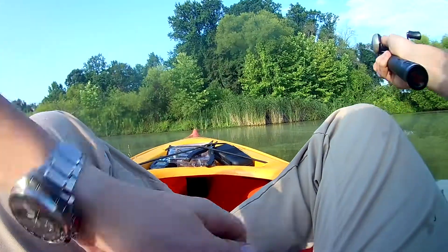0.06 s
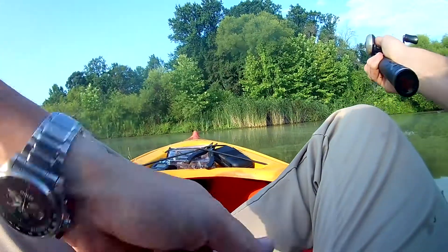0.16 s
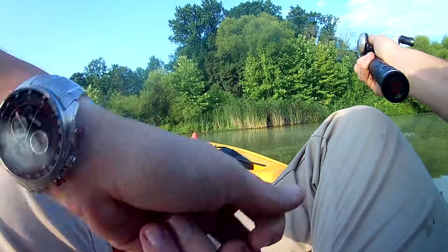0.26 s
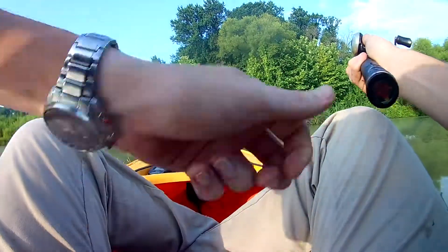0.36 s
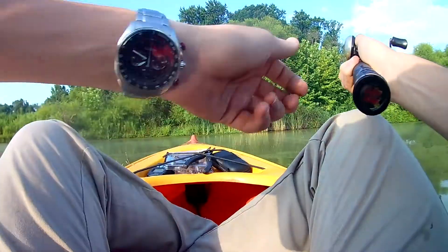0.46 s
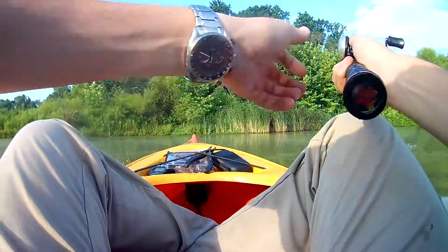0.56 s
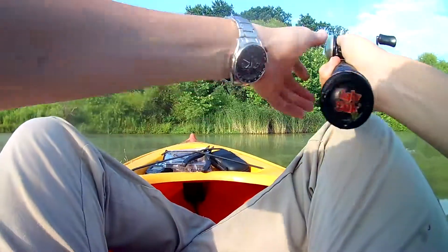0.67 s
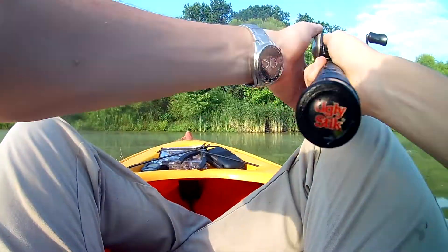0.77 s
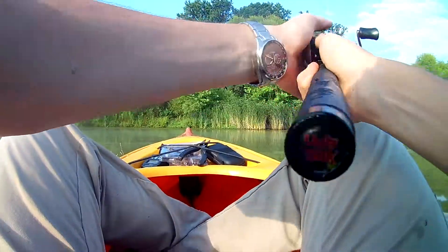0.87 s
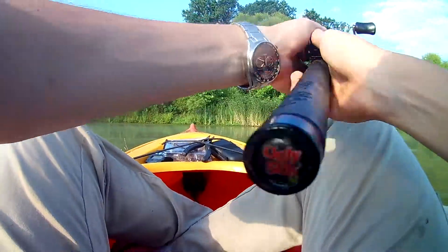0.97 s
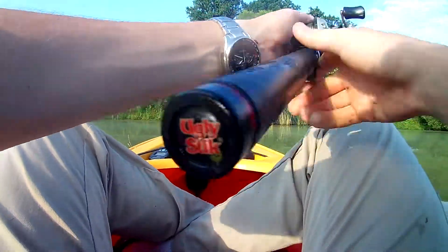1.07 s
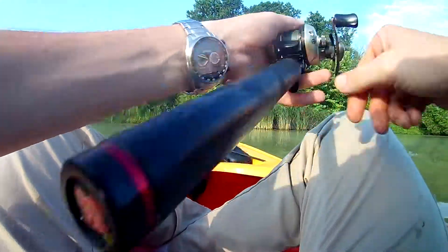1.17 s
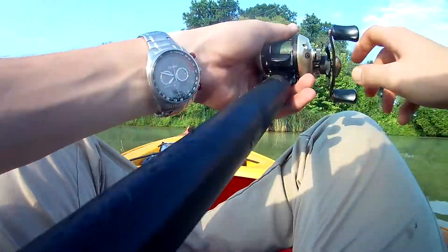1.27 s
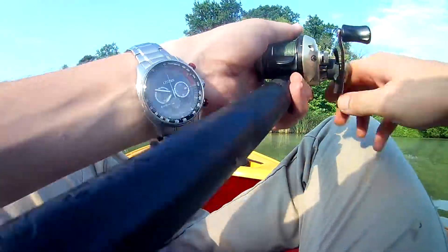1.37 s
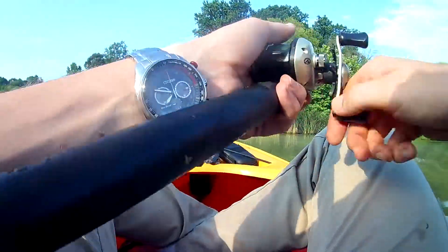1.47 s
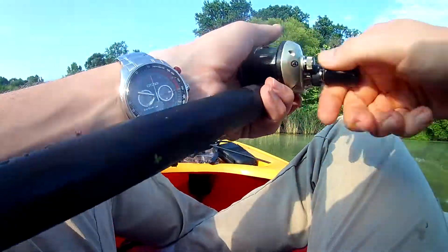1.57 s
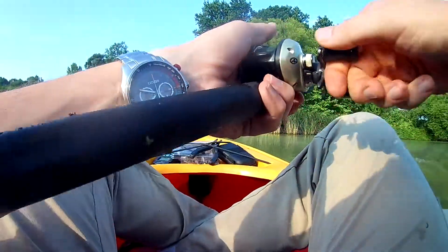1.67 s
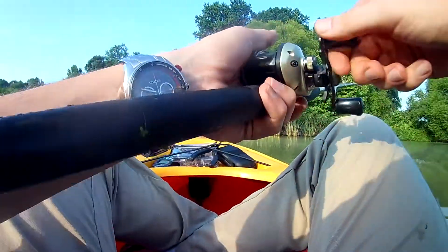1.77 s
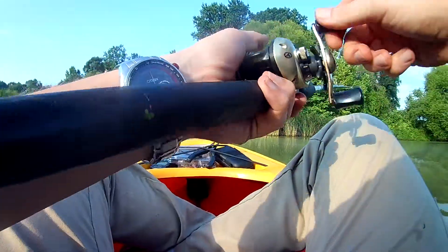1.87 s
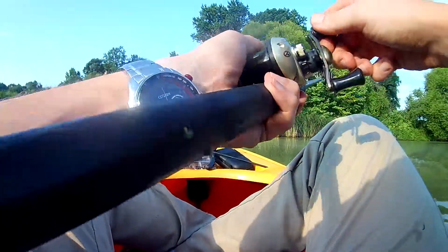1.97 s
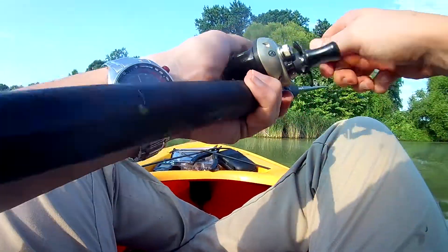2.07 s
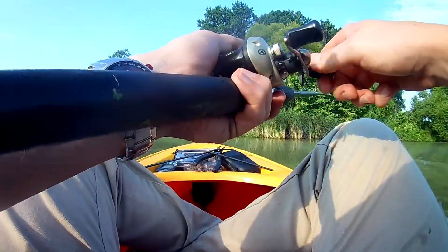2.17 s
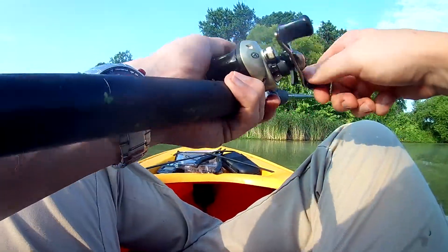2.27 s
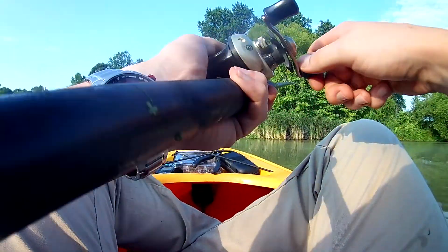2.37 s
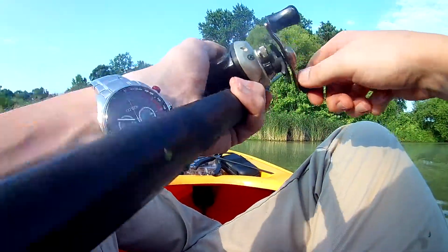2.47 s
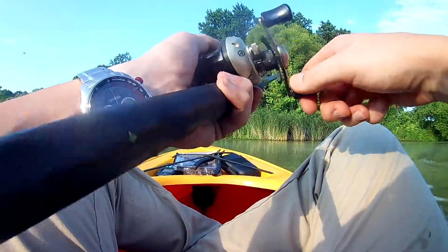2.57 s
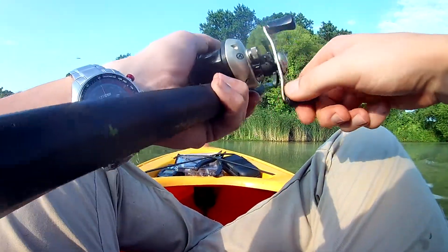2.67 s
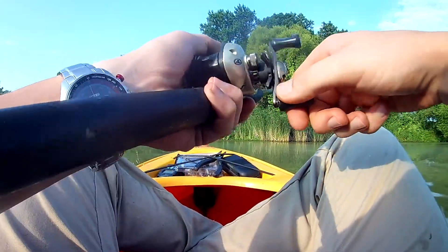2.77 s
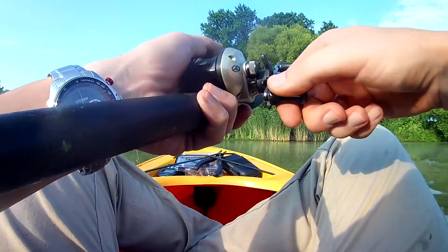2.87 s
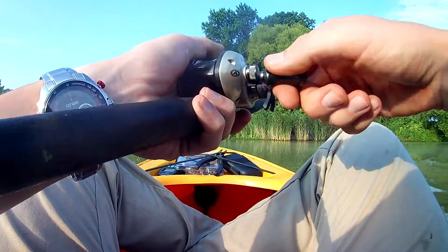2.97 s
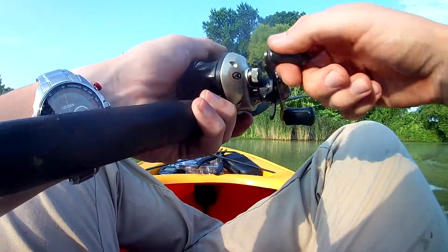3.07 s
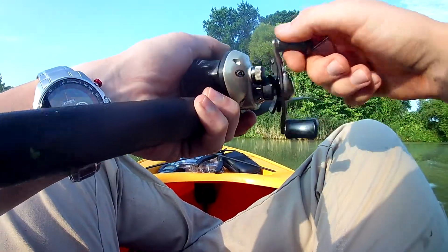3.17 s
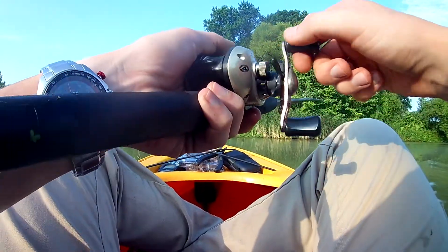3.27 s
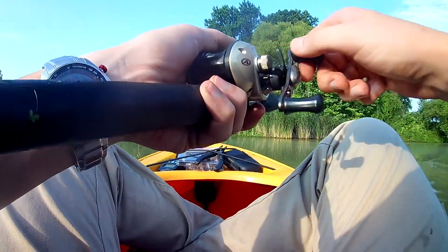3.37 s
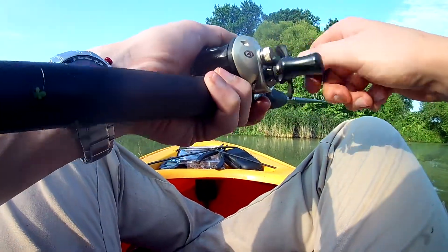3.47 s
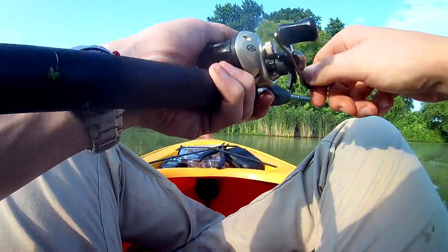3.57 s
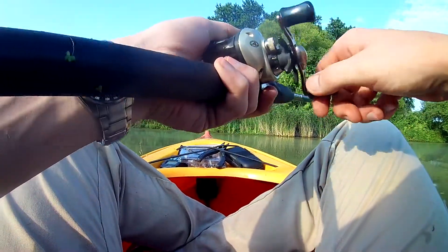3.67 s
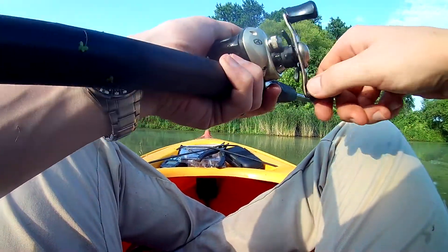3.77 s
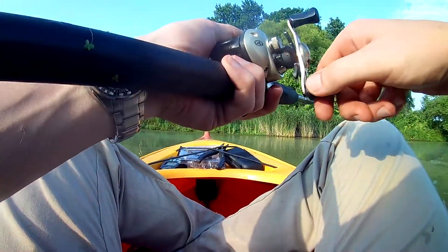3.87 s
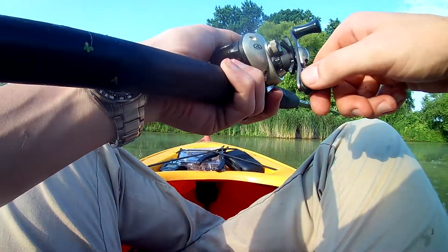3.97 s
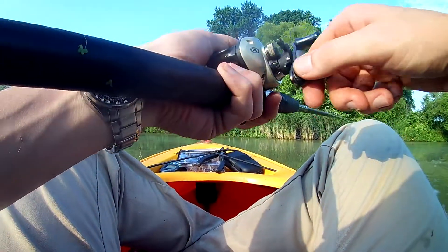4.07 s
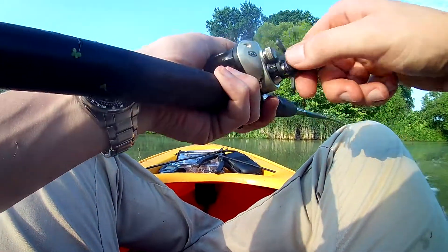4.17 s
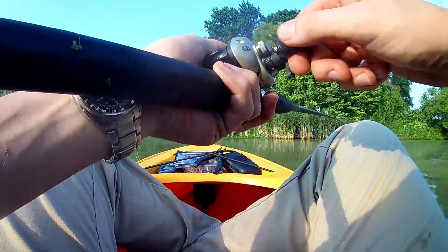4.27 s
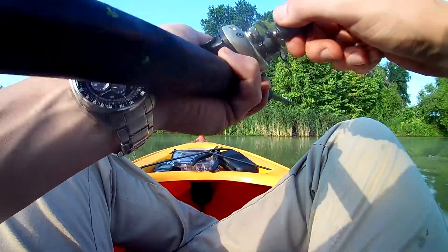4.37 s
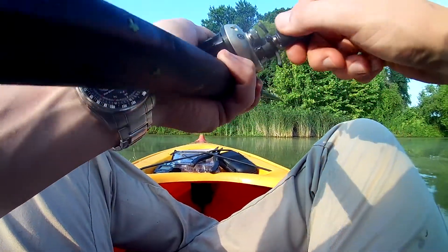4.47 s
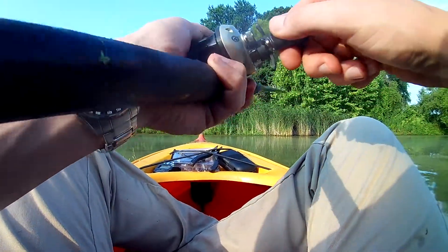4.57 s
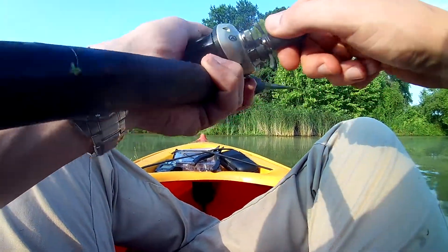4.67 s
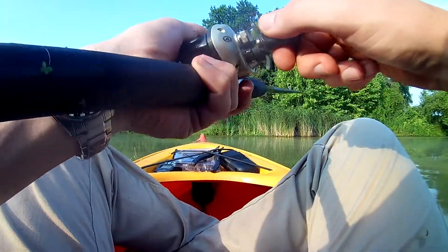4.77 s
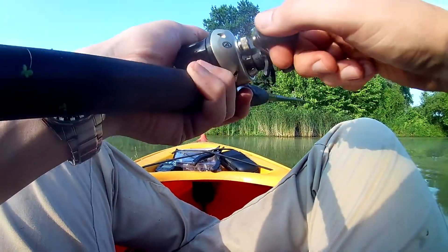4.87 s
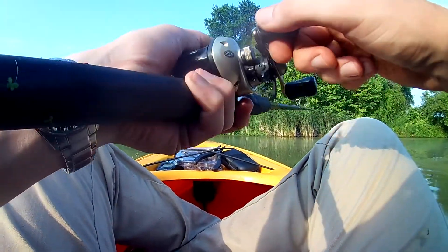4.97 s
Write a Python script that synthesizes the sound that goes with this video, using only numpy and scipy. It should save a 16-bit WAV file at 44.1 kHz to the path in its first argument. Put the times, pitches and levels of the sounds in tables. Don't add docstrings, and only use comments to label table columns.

```python
import sys
import numpy as np
from scipy import signal
from scipy.fft import rfft, irfft, next_fast_len
from scipy.io import wavfile
from scipy.ndimage import uniform_filter1d

SR = 44100
rng = np.random.default_rng(int(sys.argv[2]) if len(sys.argv) > 2 else 0)


def bounce(signal):
    frames = np.transpose(np.atleast_2d(signal))
    limited = np.clip(frames, -1, 1)
    pcm = np.round(limited * 32767).astype(np.int16)
    wavfile.write(sys.argv[1], SR, pcm)


def volts_from_db(level):
    exponent = np.asarray(level, float) / 20
    return 10 ** exponent


N = 220985

# pitch_hz, level_db, t60_s
REEL_MODES = [(329, -8.5, .04), (465, 1, .07), (530, -8.5, .05), (653, -8.5, 0.06), (764, -6, .04),
              (816.6, -7, 0.071), (900, -2.5, 0.041), (1050, -7, 0.076), (1156, -2, 0.048),
              (1368, -8.5, .06), (1619, -11, .05), (2050, -5.5, 0.032), (2230, -8.5, 0.05), (2400, -6, .03),
              (2753, -16.5, 0.045), (3140, -2.5, 0.01), (3855, 0.5, 0.019), (4240, -4, 0.012),
              (4740, 5, 0.012), (5226, -4.5, 0.028), (5800, -1, 0.012), (7500, -14, 0.048),
              (6400, -13.5, 0.012), (8560, -8, 0.011), (9200, -11.5, 0.013), (9900, -14, 0.015),
              (10480, -12, 0.014), (11450, -14.5, 0.014), (12400, -30, .01), (14300, -28, .005)]
# start_s, peak_db, centre_hz, spread_octaves, ring_share (of t60)
SNAP_BLOWS = [
    (1.5424, -28, 1526, 1.5, .6),
    (1.5438, -12, 4890, 0.85, 0.55),
    (1.5428, -26, 496, .45, .9),
    (1.5456, -13.5, 4600, .8, 0.62),
    (1.5458, -17, 1298, 0.98, .4),
    (1.5505, -29.5, 2140, 0.64, 0.7),
    (1.5536, -29.5, 610, 0.91, 0.66),
    (1.5588, -24.5, 4890, 0.93, 0.5),
    (1.5600, -29, 900, 1., .6),
    (1.5635, -30, 1710, 1.1, 0.45),
]
# start_s, peak_db, centre_hz
PINGS = [(.022, -51, 5960), (.039, -47.5, 1330), (.209, -43, 5930), (.224, -40.5, 5800), (.275, -48, 5800),
         (.333, -47.5, 5800), (.603, -54, 5200), (1.717, -49.5, 2180), (1.777, -53.5, 2050),
         (1.927, -51.5, 2190), (2.042, -47.5, 3100), (2.545, -54.5, 1540), (2.578, -55, 1490),
         (2.655, -56, 1560), (4.3845, -42.5, 1257), (4.385, -44, 2230), (4.385, -44.5, 335),
         (4.664, -56.5, 2230), (4.918, -60.5, 1130)]
# start_s, peak_db, centre_hz
TAPS = [(.022, -41.5, 1300), (1.443, -52, 2070), (1.468, -46.5, 796), (1.502, -43, 710), (1.675, -56, 1110),
        (1.738, -54, 1000), (1.929, -54, 790), (2.043, -51.5, 1050), (2.557, -46, 683), (2.566, -59.5, 790),
        (4.340, -52.5, 900), (4.666, -50, 500), (4.899, -54.5, 610)]
# start_s, peak_db, centre_hz
CLACKS = [(.435, -52.5, 2480), (1.504, -42, 1920), (1.651, -50.5, 1575), (1.711, -50, 1770),
          (1.722, -51.5, 900), (1.731, -50.5, 1580), (2.273, -56.5, 1470), (2.396, -52, 1300),
          (4.345, -47.5, 1520), (4.880, -51.5, 1390)]
PING_SPREAD_OCTAVES, PING_RING_SHARE = 0.2, 0.65
TAP_SPREAD_OCTAVES, TAP_RING_SHARE = 0.55, 0.44
CLACK_SPREAD_OCTAVES, CLACK_RING_SHARE = 1, 0.4
# middle_s, length_s, level_db, centre_hz, width_hz
RUBS = [(.015, 0.026, -62, 1200, 1540), (.21, 0.047, -58.5, 820, 787), (.01, 0.024, -59.5, 5800, 2000),
        (0.229, .045, -67, 11850, 900), (1.045, 0.029, -65.5, 2220, 596), (1.10, 0.055, -52.5, 724, 500),
        (1.13, .10, -53, 344, 445), (1.348, .12, -75, 1660, 300), (3.12, 0.044, -61, 589, 60),
        (4.889, .05, -62, 560, 298), (4.485, .04, -60, 177, 100), (4.55, .02, -59.5, 273, 120)]
# start_s, peak_db, free_ring_s
HULL_BUMP = (4.6240, -30, .039)
# pitch_hz, level_db, t60_s
HULL_MODES = [(310, 0, .12), (403, -0.5, 0.011), (500, 4, .018)]
# time_s, level_db
INSECT_LEVELS = [(0.0, -65), (0.57, -66.5), (0.87, -61.5), (1.05, -65), (2.4, -69.5), (3.0, -71),
                 (5.01, -74.5)]
# centre_hz, width_hz, level_db, throb_db
INSECT_BANDS = [(2675, 410, -9, 3), (3913, 650, -3.5, 1.5), (4790, 580, -7.5, 3.5), (5470, 800, -1.5, 4.5),
                (7300, 500, -12.5, 3)]
# start_s, length_s, from_hz, to_hz, level_db
BIRDS = [(.75, .08, 5700, 6000, -67), (1.653, .047, 3650, 4600, -63), (1.868, .055, 3500, 4650, -64),
         (2.08, .035, 3650, 3300, -68), (2.15, .035, 4800, 4050, -66), (2.185, .025, 3900, 4600, -64),
         (2.303, .05, 3750, 4850, -65), (2.435, .04, 4300, 5500, -66), (2.65, .055, 5400, 2300, -65),
         (2.35, .025, 4700, 3300, -68), (2.70, .05, 4950, 4300, -67), (2.46, .05, 5400, 5700, -66),
         (2.77, .045, 3350, 3720, -68), (2.808, .06, 3720, 3700, -67), (3.68, .07, 2700, 2200, -71)]
# pitch_hz, density_db (per Hz)
AIR_SPECTRUM = [(12, -26.5), (20, -4.5), (90, -3.5), (119, -1), (202, -5), (597, -10.5), (1010, -12.5),
                (1920, -25), (2340, -20), (3260, -22), (5540, -16), (7500, -35), (7800, -42.5),
                (15500, -47.5)]
# time_s, level_db
BREEZE = [(0.0, -63), (0.75, -65), (1.56, -60.5), (2.0, -64), (3.45, -64), (5.01, -65.5)]
AIR_DB = -61
# pitch_hz, step_db
CAMERA_STEPS = [(100, -11.5), (700, -4), (1500, 1), (3300, 0.5), (5500, -4.5), (6300, -0.5), (7600, 5),
                (7900, 8.5), (16000, 9)]
STARVED_S = [.06, .22, .45, .64, .661, .705, .83, .94, .961, 1.33, 1.82, 2.08, 2.53, 2.64, 3.05, 3.13, 3.41,
             3.66, 4.15, 4.42, 4.59, 4.64]
STARVED_DB = 7.5
HOP, FIRST, BINS = 941, 720, 10


def level(x, db):
    return x * volts_from_db(db) / np.sqrt(np.mean(x ** 2))


def band(x, hz, width):
    n = next_fast_len(len(x))
    f = np.fft.rfftfreq(n, 1 / SR)
    bell = np.exp(-0.5 * ((f - hz) / width) ** 2)
    return irfft(rfft(x, n) * bell, n)[:len(x)]


def walk(rate):
    k = int(SR / rate)
    held = np.repeat(rng.standard_normal(N // k + 1), k)
    return 1.5 * uniform_filter1d(uniform_filter1d(held, k), k)[:N]


def over_time(table):
    s, db = np.transpose(table)
    return np.interp(np.arange(N) / SR, s, db)


def add(out, s, x):
    i = max(int(s * SR), 0)
    out[i:i + len(x)] += x[:N - i]


def ring(modes, peak_db, gain, share, detune, rise=0.0003):
    hz, db, t60 = np.transpose(modes)[:, :, None]
    t = np.arange(SR // 5) / SR
    decay = np.exp(-np.log(1000) * t / (t60 * share))
    x = volts_from_db(db) * gain * np.sin(2 * np.pi * hz * detune * t) * decay
    x = x.sum(axis=0) * (1 - np.exp(-(t / rise) ** 2))
    return volts_from_db(peak_db) * x / np.abs(x).max()


def reel(blows):
    out = np.zeros(N)
    count = len(REEL_MODES)
    hz = np.array(REEL_MODES)[:, :1]
    sign = (-1.0) ** np.arange(count)[:, None]
    chance = rng.standard_normal((len(blows), 2, count, 1))
    grit = rng.standard_normal((len(blows), SR // 40))
    for (s, db, centre_hz, spread, share), (size, off), g in zip(blows, chance, grit):
        reach = np.exp(-0.5 * (np.log2(hz / centre_hz) / spread) ** 2)
        gain = reach * sign * volts_from_db(1.4 * size)
        add(out, s, ring(REEL_MODES, db, gain, share, 1 + 0.0036 * off))
        fade = np.exp(-np.arange(len(g)) / SR / (0.0044 * share))
        crack = band(g, centre_hz, 0.41 * spread * centre_hz) * fade
        add(out, s, crack * volts_from_db(db - 7.5) / np.abs(crack).max())
    return signal.sosfilt(signal.butter(3, 290, "high", fs=SR, output="sos"), out)


def clutch_snap():
    return reel(SNAP_BLOWS)


def ticks():
    kinds = [(PINGS, PING_SPREAD_OCTAVES, PING_RING_SHARE),
             (TAPS, TAP_SPREAD_OCTAVES, TAP_RING_SHARE),
             (CLACKS, CLACK_SPREAD_OCTAVES, CLACK_RING_SHARE)]
    return sum(reel([(*row, spread, share) for row in rows]) for rows, spread, share in kinds)


def hand_rubs():
    out = np.zeros(N)
    for s, length, db, hz, width in RUBS:
        chance = rng.standard_normal((2, SR // 3))
        n = int(2 * length * SR)
        size_db = 1.3 * uniform_filter1d(chance[1], size=64) * 8
        grains = chance[0] * volts_from_db(size_db)
        add(out, s - length, level(band(grains, hz, width / 2)[:n], db) * np.hanning(n))
    return out


def hull_bump():
    out, t = np.zeros(N), np.arange(SR // 5) / SR
    s, db, free = HULL_BUMP
    rising = 1 + 2.6 * t
    pressed = 1 + np.exp((t - free) / 0.0028)
    add(out, s, ring(HULL_MODES, db, 1, 0.93, rising, rise=0.00075) / pressed)
    return signal.sosfilt(signal.butter(3, [250, 720], "band", fs=SR, output="sos"), out)


def insects():
    throb = np.clip(walk(80), 0, 1.6)
    chorus = np.zeros(N)
    for hz, width, db, throb_db in INSECT_BANDS:
        swell_db = db + throb_db * throb + 1.5 * walk(35) + 1.1 * walk(4)
        chorus += volts_from_db(swell_db) * band(rng.standard_normal(N), hz, width / 2)
    return level(chorus, 1) * volts_from_db(over_time(INSECT_LEVELS))


def birds():
    out = np.zeros(N)
    for s, length, from_hz, to_hz, db in BIRDS:
        n = int(length * SR)
        phase = 2 * np.pi * np.cumsum(np.linspace(from_hz, to_hz, n)) / SR
        add(out, s, volts_from_db(db) * np.hanning(n) ** 0.5 * np.sin(phase))
    return out


def air():
    n = next_fast_len(N)
    f = np.fft.rfftfreq(n, 1 / SR) + 1
    hz, db = np.transpose(AIR_SPECTRUM)
    tilt = rfft(rng.standard_normal(n)) * volts_from_db(np.interp(np.log(f), np.log(hz), db))
    gust_db = over_time(BREEZE) - np.transpose(BREEZE)[1].mean()
    out = np.zeros(N)
    for k in np.arange(8, 30):
        share = np.cos(np.pi / 2 * np.clip(2 * np.log2(f) - k, -1, 1)) ** 2
        out += volts_from_db(0.71 * gust_db + 1.04 * walk(12)) * irfft(tilt * share, n)[:N]
    return level(out, AIR_DB)


def camera_rounding(x):
    n, k = np.arange(2 * HOP) + 0.5, np.arange(HOP) + 0.5
    window = np.sin(np.pi * n / (2 * HOP))[:, None]
    basis = window * np.cos(np.pi / HOP * np.outer(n + HOP / 2, k)) * np.sqrt(2 / HOP)
    starts = np.arange(FIRST, N + 2 * HOP, HOP)
    c = np.pad(x, (2 * HOP, 2 * HOP))[starts[:, None] + np.arange(2 * HOP)] @ basis
    middle = (starts - HOP) / SR
    starved = (np.abs(middle[:, None] - STARVED_S) < HOP / SR / 2).any(axis=1)
    need_db = STARVED_DB * starved[:, None]
    local = np.sqrt(uniform_filter1d(c ** 2, size=36, axis=1))
    loud_db = 20 * np.log10(local / np.median(local, axis=0))
    scatter_db = 2.5 * rng.standard_normal((len(c), HOP // BINS + 1))
    hz, db = np.transpose(CAMERA_STEPS)
    f = k * SR / (2 * HOP)
    favour = np.where(f < 6000, -0.11, 0.0)
    step = local * volts_from_db(np.interp(f, hz, db) + need_db + favour * loud_db)
    step = step[:, BINS // 2::BINS]
    step = np.repeat(step * volts_from_db(scatter_db[:, :step.shape[1]]), BINS, axis=1)
    top = step.shape[1]
    c = c[:, :top]
    rounded = np.sign(c) * np.floor(np.abs(c) / step + 0.4) * step
    blocks = rounded @ basis[:, :top].T
    return (blocks[1:, :HOP] + blocks[:-1, HOP:]).ravel()[HOP - FIRST:][:N]


def scene():
    near = clutch_snap() + ticks() + hand_rubs() + hull_bump()
    far = insects() + birds() + air()
    return (near + far)[None]


def roll_off(x):
    return signal.sosfilt(signal.butter(12, 15670, fs=SR, output="sos"), x)


def record(dry):
    mix = camera_rounding(dry[0])[None]
    return roll_off(mix)


dry = scene()
out = record(dry)
bounce(out)
```